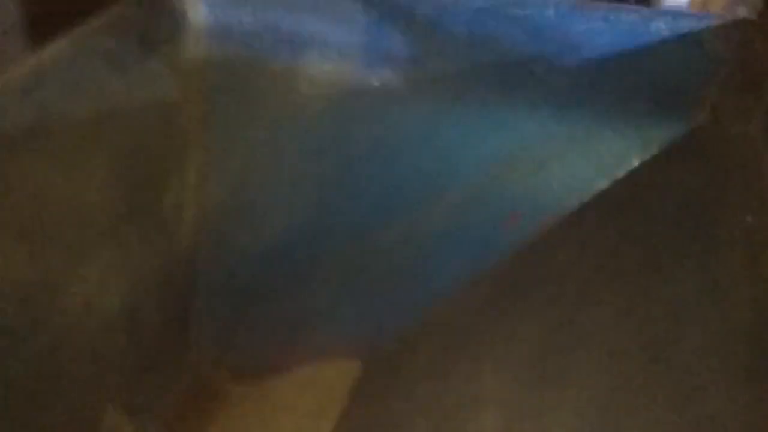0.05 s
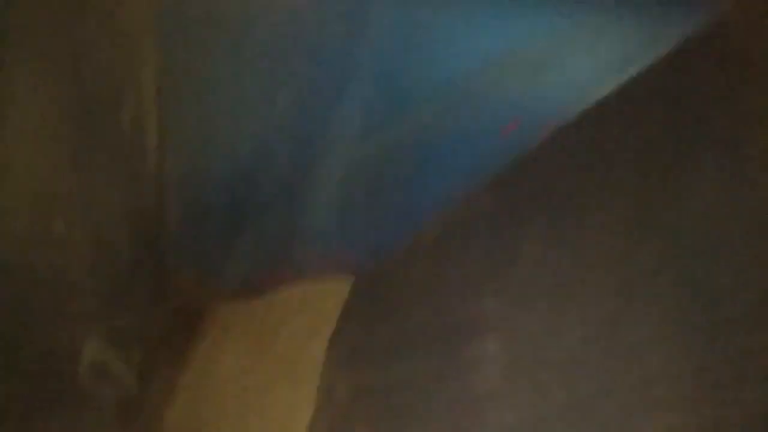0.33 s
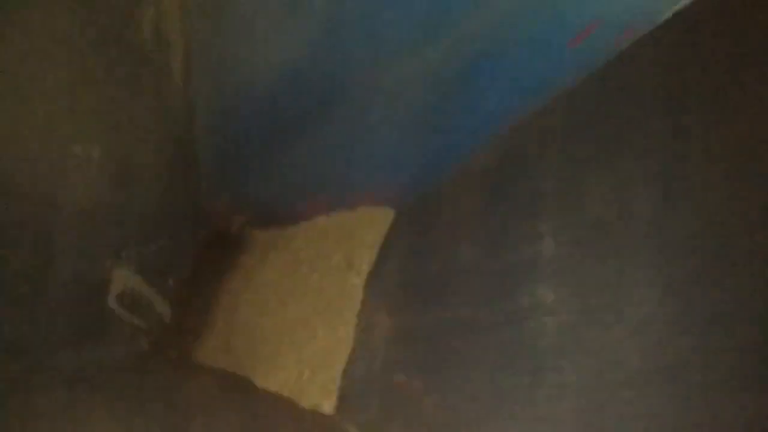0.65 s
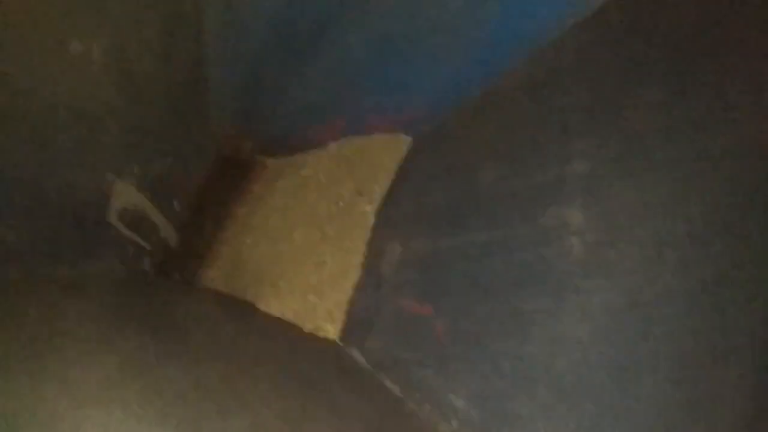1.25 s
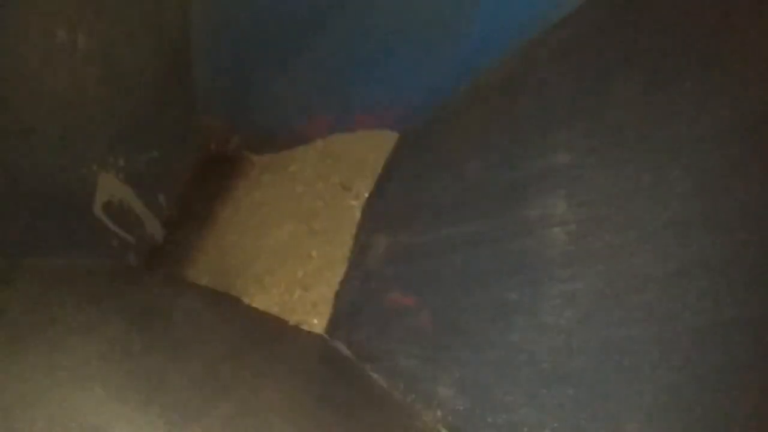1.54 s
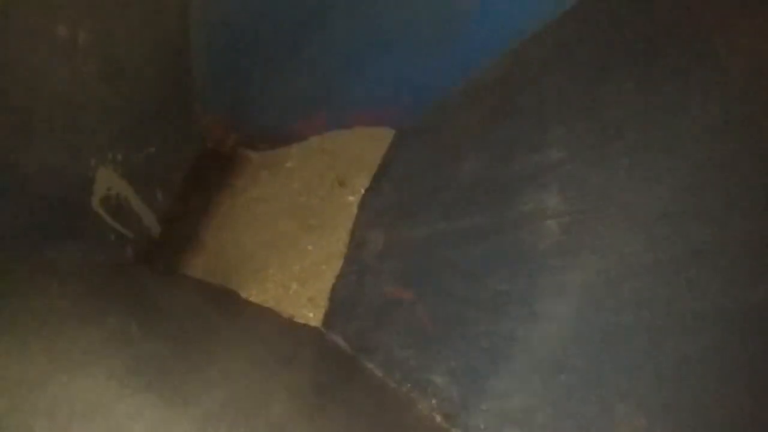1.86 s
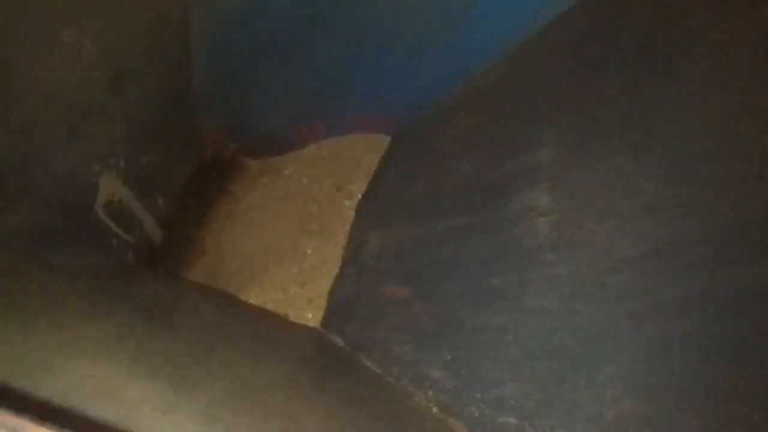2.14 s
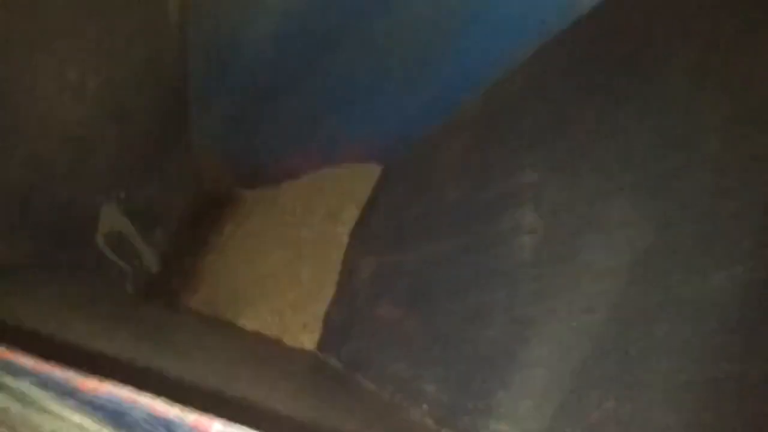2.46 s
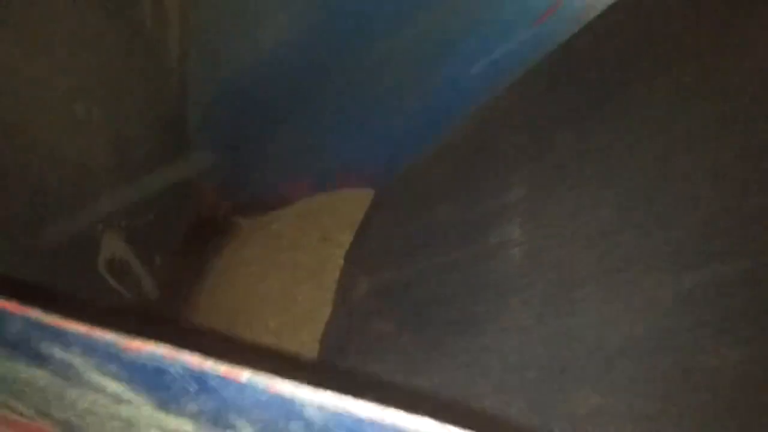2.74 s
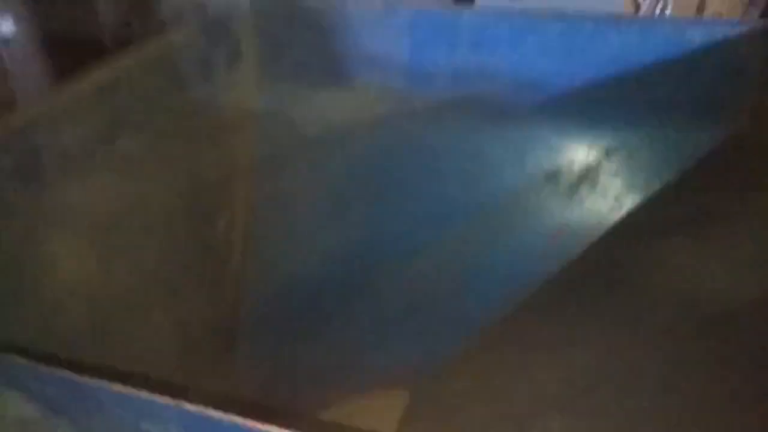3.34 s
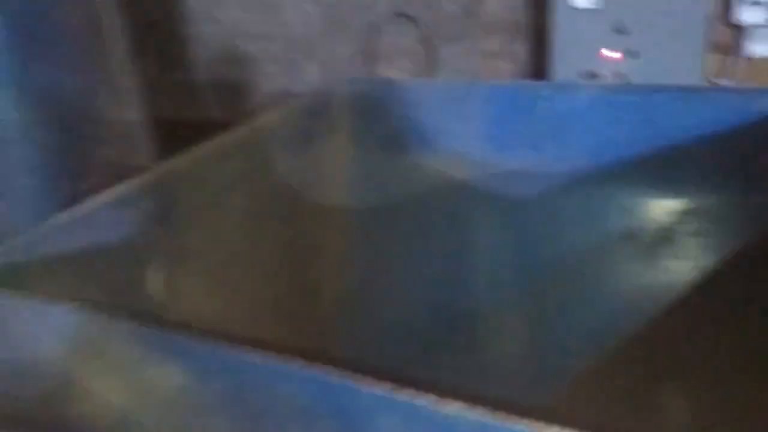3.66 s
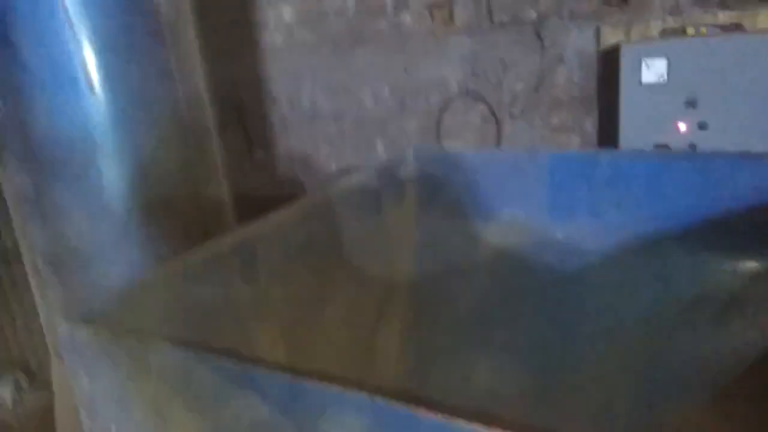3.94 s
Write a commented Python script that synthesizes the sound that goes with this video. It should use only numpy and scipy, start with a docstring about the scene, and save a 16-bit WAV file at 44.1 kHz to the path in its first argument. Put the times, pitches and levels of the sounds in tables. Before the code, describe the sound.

An electric grinding mill runs without pause, heard close over its open steel hopper. A low motor hum and hollow drumming lie under the crunch and hiss of meal striking steel, which swells in small, uneven surges.

```python
"""An electric grinding mill runs steadily, heard over its open steel hopper.
Its rotor hums at harmonics of the turning rate, beside faint tones of the drive, and churns the air
in the housing, which drums. The meal crunches and hisses as countless particles strike the steel,
in small surges, and the impacts echo between the hopper walls. Each passing beater modulates the
churning and the grinding. A fast limiter holds the peaks."""
import sys
import numpy as np
from scipy import signal
from scipy.fft import rfft, irfft, next_fast_len
from scipy.io import wavfile
from scipy.ndimage import uniform_filter1d, minimum_filter1d, map_coordinates

SR = 44100
rng = np.random.default_rng(int(sys.argv[2]) if len(sys.argv) > 2 else 0)


def dump(signal):
    """Clip the signal to [-1, 1] and save it as 16-bit WAV at the path in sys.argv[1]."""
    limited = np.clip(np.atleast_2d(signal).T, -1, 1)
    pcm = np.round(limited * 32767).astype(np.int16)
    wavfile.write(sys.argv[1], SR, pcm)


N = 176400

ROTOR_HZ, BEATERS, WANDER_RAD = 16.215, 4, 0.0095
RUMBLE_DB, HOUSING_DB, CRUNCH_DB, HISS_DB, SPRAY_DB = -23, 0.66, 0.96, -2.5, -3.5
IMPACTS_PER_S, IMPACT_SPREAD_DB, IMPACT_POWER_SHARE = 4500, 3, 0.47
ROUND_TRIP_S, ECHO_SMEAR_S, ECHO_GAIN = 0.00412, 0.00017, 0.2
CEILING, HOLD_S, TOP_HZ = 0.71, 0.0066, 15600

# Harmonics of the rotor (multiple of the turning rate [1], level [dB])
ROTOR_HARMONICS = [(4, -47), (6, -40.5), (8, -18), (9, -32.5), (10, -27), (12, -13), (16, -33), (19, -35),
                   (20, -30.5), (24, -25.5), (26, -38.5), (32, -42), (36, -45), (40, -45)]
# Tones of the drive and the frame (frequency [Hz], level [dB])
DRIVE_TONES = [(29.7, -53), (573, -40.5), (752, -44)]
# Rumble of tumbling air and meal (frequency [Hz], relative spectral level [dB])
RUMBLE_SPECTRUM = [(15, -35), (45, -26), (80, -19), (110, -10.5), (155, -1), (205, -6), (235, -7),
                   (300, -13), (600, -38), (2000, -90)]
# Resonances of the housing (frequency [Hz], relative spectral level [dB])
HOUSING_SPECTRUM = [(150, -36), (240, -8.5), (275, -8), (312, 2), (345, -5.5), (375, -2), (410, -6),
                    (445, -8.5), (470, -14), (505, -12), (540, -19), (580, -15), (645, -15), (690, -23.5),
                    (800, -22), (1400, -46), (3000, -90)]
# Strength of the housing's drumming (time [s], relative level [dB])
DRUMMING_LEVEL = [(0, -24), (.6, -21), (1.5, -21.5), (2.6, -24.5), (3.3, -23), (4, -24.5)]
# Coarse crunch of the meal (frequency [Hz], relative spectral level [dB])
CRUNCH_SPECTRUM = [(200, 3), (450, 2.5), (700, 0), (850, 2), (1100, 1.5), (1350, -3), (1800, -0.5),
                   (2200, -4.5), (2700, -10), (3400, -22), (5000, -34), (12000, -58)]
# Fine hiss in the upper treble (frequency [Hz], relative spectral level [dB])
HISS_SPECTRUM = [(2000, -21), (3600, -16.5), (5000, -13.5), (7000, -8.5), (8000, -2), (9000, 0.5),
                 (10000, -2), (11500, -5.5), (13500, -11), (16000, -13)]
# Spray in the lower treble (frequency [Hz], relative spectral level [dB])
SPRAY_SPECTRUM = [(1800, -30), (2900, -10.5), (4200, -12), (5100, -7), (5800, -1), (6500, -1), (7600, -3.5),
                  (9500, -17), (15000, -35)]
# Balance as the listener leans over the hopper (time [s], crunch [dB], hiss [dB], spray [dB])
GRINDING_BALANCE = [(0.0, -2.5, -4.4, -8.5), (0.9, -1.5, -4, -9), (2.1, -2.0, -3.5, -8.5),
                    (3.0, -2.5, -3.5, -9), (3.7, -3.5, -3.5, -6.5), (4.0, -4.0, -4.5, -5.5)]
# Flow of meal to the rotor (time [s], relative level [dB])
FEED_LEVEL = [(0.0, -24.6), (0.3, -26.5), (0.53, -25.5), (0.63, -28), (0.77, -26.5), (0.87, -30.5),
              (1.02, -28.5), (1.48, -27), (1.52, -30.5), (1.9, -28), (2.23, -27.5), (2.3, -30),
              (2.44, -26.5), (2.51, -30), (2.86, -25.5), (3.36, -28), (3.43, -25.5), (4.0, -24.5)]
# Lumps caught by the rotor (time [s], duration [s], boost [dB])
LUMPS = [(0.105, 0.03, 3), (0.165, 0.035, 4), (0.375, 0.024, 1.5), (0.97, 0.025, 3), (1.155, 0.019, 4.4),
         (2.658, 0.03, 1.5), (3.238, 0.042, 6), (3.518, 0.034, 2.3), (3.855, 0.046, 4), (3.952, 0.025, 2.3)]


def amp(db):
    """Amplitude ratio of a level in decibels."""
    return 10 ** (np.asarray(db) / 20)


def unit(x):
    """Normalisation to an rms of 1."""
    return x / np.sqrt(np.mean(x ** 2) + 1e-20)


def wobble(knots_per_s):
    """Smooth fluctuation by spline interpolation between random knots."""
    knots = rng.standard_normal(1024)
    return map_coordinates(knots, [np.arange(N) * knots_per_s / SR], mode="wrap")


def filtered(x, response):
    """Linear filtering: the spectrum is multiplied by a frequency response."""
    size = next_fast_len(N + SR // 2)
    return irfft(rfft(x, size) * response(np.fft.rfftfreq(size, 1 / SR)), size)[:N]


def coloured(x, spectrum):
    """Spectral shaping, interpolated in log frequency; the result has an rms of 1."""
    freqs, db = np.transpose(spectrum)
    return unit(filtered(x, lambda hz: amp(np.interp(np.log(hz + 1), np.log(freqs), db))))


def rotor_hum(angle):
    """Periodic motion radiates harmonics of the turning rate; the higher ones waver more in level."""
    hum = np.zeros(N)
    for order, db in ROTOR_HARMONICS:
        peak = np.sqrt(2) * amp(db + 0.06 * order * wobble(9))
        hum += peak * np.sin(order * angle + rng.uniform(0, 2 * np.pi))
    return hum


def drive_tones(t):
    """Random amplitude and phase modulation slightly broaden the tones of the drive and frame."""
    tones = np.zeros(N)
    for hz, db in DRIVE_TONES:
        peak = np.sqrt(2) * amp(db + 3.5 * wobble(7))
        tones += peak * np.sin(2 * np.pi * hz * t + 0.62 * wobble(11))
    return tones


def churn(t, beater_pulse, surge_db, pulse_depth=0.19):
    """Forced vibration: tumbling air and meal rumble and excite the resonances of the housing."""
    rumble = amp(RUMBLE_DB) * coloured(rng.standard_normal(N), RUMBLE_SPECTRUM)
    drum_db = np.interp(t, *np.transpose(DRUMMING_LEVEL)) + HOUSING_DB
    drum_db += 0.49 * surge_db  # part of each surge shakes the housing
    drumming = amp(drum_db) * coloured(rng.standard_normal(N), HOUSING_SPECTRUM)
    waver = amp(wobble(16))
    return waver * (1 + pulse_depth * beater_pulse) * (rumble + drumming)


def particle_impacts():
    """Shot noise: particles strike the steel at random, over the Gaussian rush of the finest dust."""
    strikes = rng.random(N) < IMPACTS_PER_S / SR
    polarity = np.sign(rng.standard_normal(N))
    strength = amp(IMPACT_SPREAD_DB * rng.standard_normal(N))
    impacts = unit(strikes * polarity * strength)
    dust = rng.standard_normal(N)
    return np.sqrt(IMPACT_POWER_SHARE) * impacts + np.sqrt(1 - IMPACT_POWER_SHARE) * dust


def grinding(t, beater_pulse, surge_db, pulse_depth=0.081):
    """Amplitude modulation: one uneven feed, pulsed by the beaters, scales three bands of impacts."""
    times, *balance = np.transpose(GRINDING_BALANCE)
    bands = (CRUNCH_SPECTRUM, CRUNCH_DB), (HISS_SPECTRUM, HISS_DB), (SPRAY_SPECTRUM, SPRAY_DB)
    meal = np.zeros(N)
    for balance_db, (spectrum, band_db) in zip(balance, bands):
        level_db = np.interp(t, times, balance_db) + band_db + 0.47 * wobble(30)
        meal += amp(level_db) * coloured(hopper_echo(particle_impacts()), spectrum)
    feed = amp(np.interp(t, *np.transpose(FEED_LEVEL)) + surge_db)
    return meal * feed * (1 + pulse_depth * beater_pulse)


def hopper_echo(direct):
    """Reflection between the slanted walls adds two echoes, weaker and more smeared on each trip."""
    delay = np.arange(SR // 100) / SR
    window = np.exp(-0.5 * ((delay - ROUND_TRIP_S) / ECHO_SMEAR_S) ** 2)
    reflection = rng.standard_normal(len(delay)) * window
    reflection *= ECHO_GAIN / np.linalg.norm(reflection)
    first = signal.fftconvolve(direct, reflection)[:N]
    second = signal.fftconvolve(first, reflection)[:N]
    return direct + first + second


def feed_surges(t):
    """Level follows flow: lumps add Gaussian swells, in dB, to the feed's flutter and faster rattle."""
    lumps = sum(db * np.exp(-(2 * (t - at) / duration) ** 2) for at, duration, db in LUMPS)
    return lumps + 0.71 * wobble(26) + 0.47 * wobble(110)


def scene():
    """Superposition of the mill's sounds; the rotor angle times both the hum and the beater pulse."""
    t = np.arange(N) / SR
    angle = 2 * np.pi * ROTOR_HZ * t + WANDER_RAD * wobble(5.72)
    beater_pulse = np.cos(BEATERS * angle)
    surge_db = feed_surges(t)
    tones = rotor_hum(angle) + drive_tones(t)
    return (tones + churn(t, beater_pulse, surge_db) + grinding(t, beater_pulse, surge_db))[None]


def record(dry):
    """Peak limiting: the gain dips around peaks above the ceiling; a low-pass then limits the band."""
    mill = dry[0]
    hold = int(HOLD_S * SR)
    needed_gain = CEILING / np.maximum(np.abs(mill), CEILING)
    smooth_gain = uniform_filter1d(minimum_filter1d(needed_gain, hold), hold)
    return filtered(mill * smooth_gain, lambda hz: hz < TOP_HZ)[None]


dry = scene()
out = record(dry)
dump(out)
```